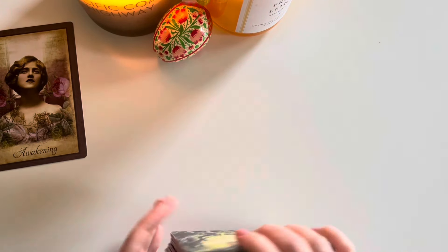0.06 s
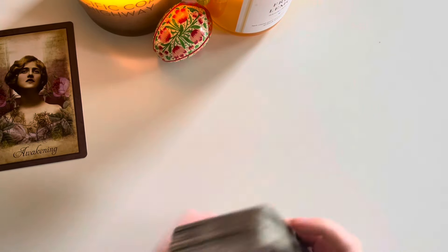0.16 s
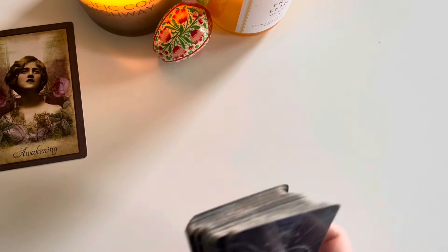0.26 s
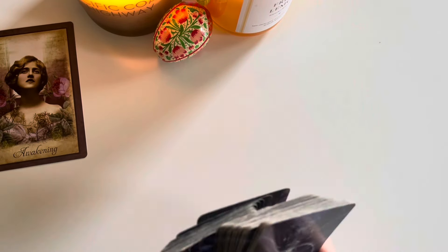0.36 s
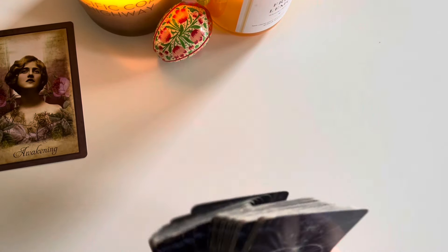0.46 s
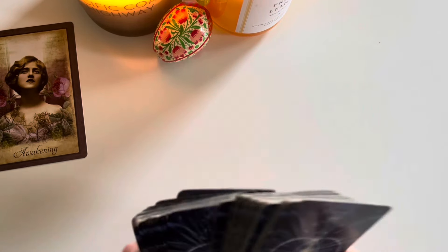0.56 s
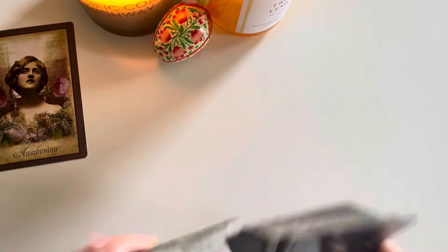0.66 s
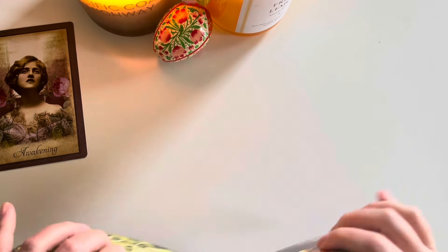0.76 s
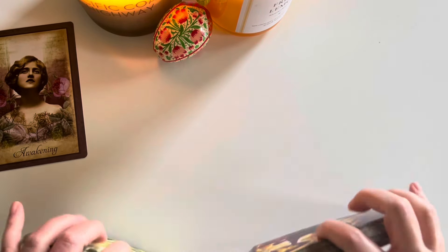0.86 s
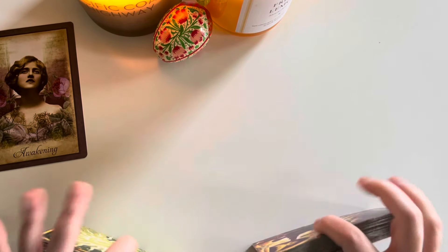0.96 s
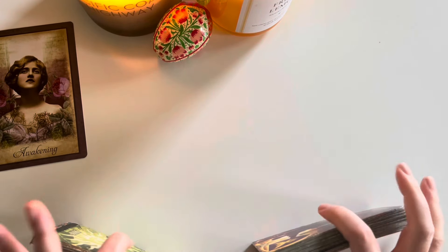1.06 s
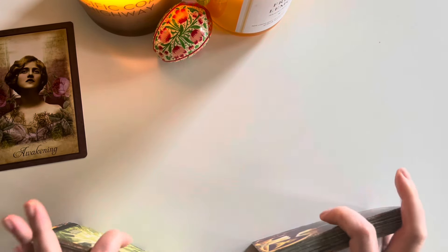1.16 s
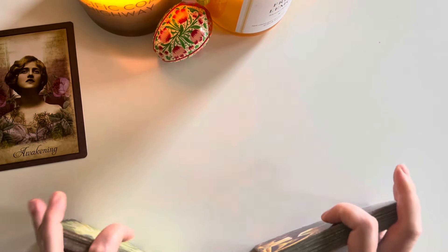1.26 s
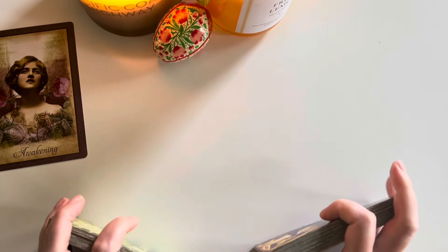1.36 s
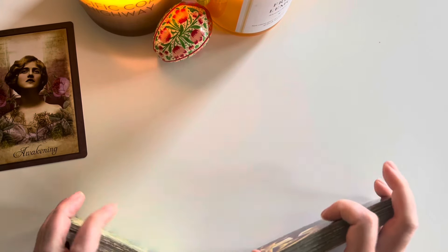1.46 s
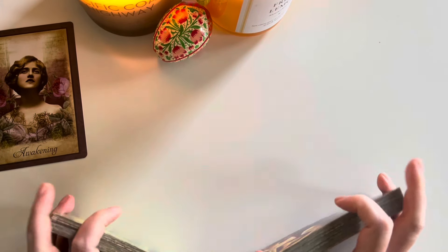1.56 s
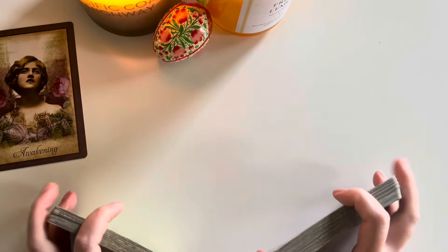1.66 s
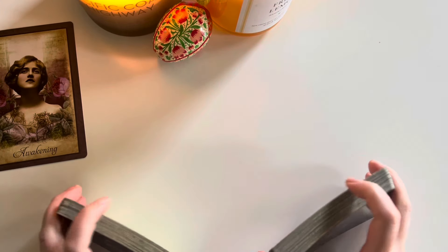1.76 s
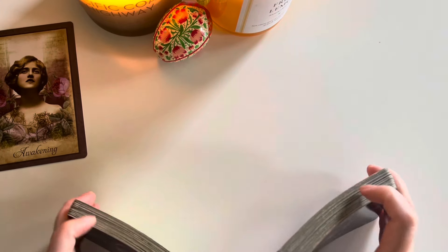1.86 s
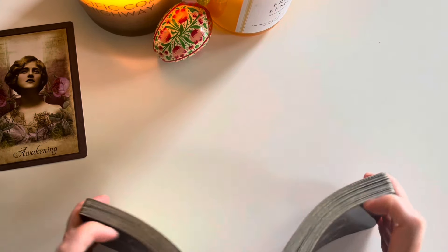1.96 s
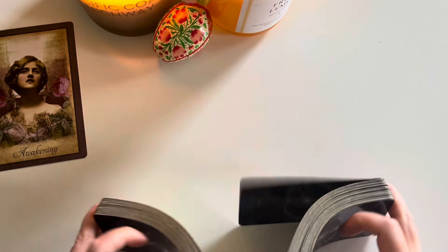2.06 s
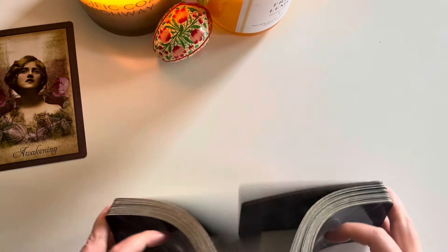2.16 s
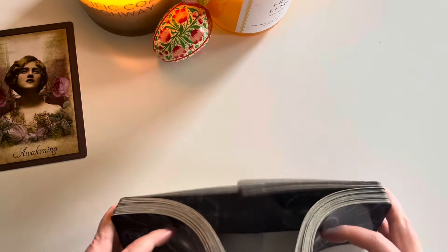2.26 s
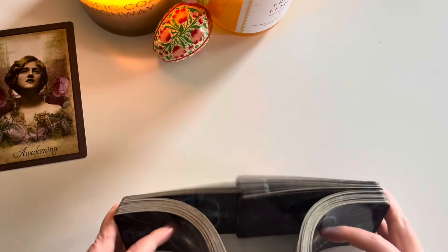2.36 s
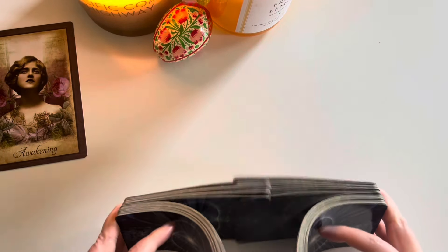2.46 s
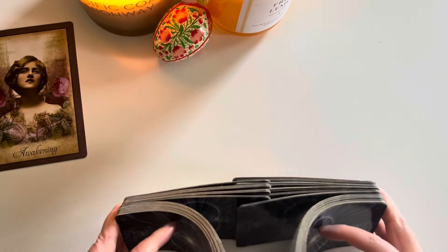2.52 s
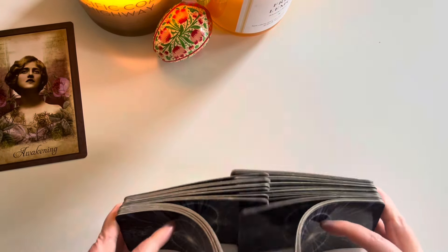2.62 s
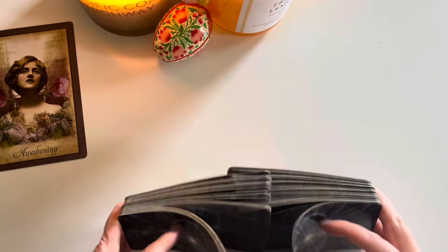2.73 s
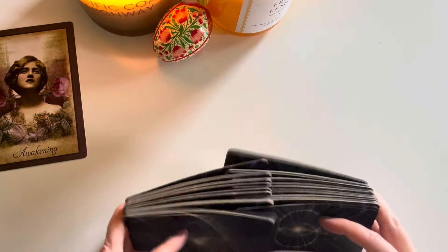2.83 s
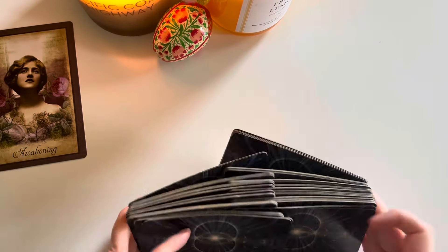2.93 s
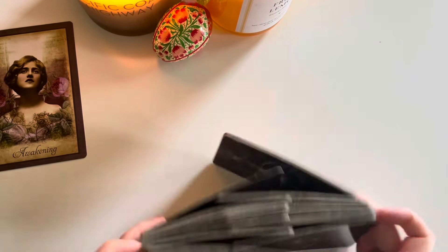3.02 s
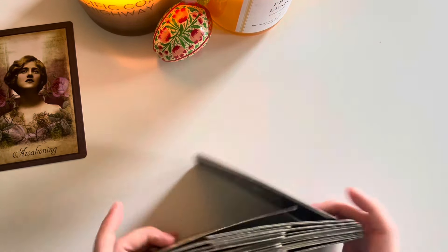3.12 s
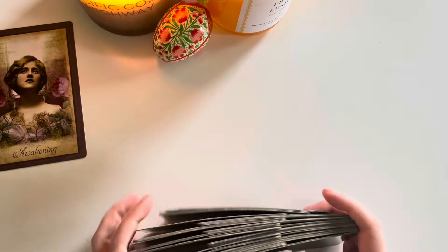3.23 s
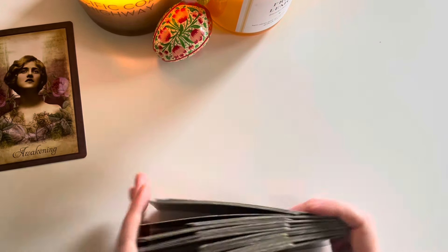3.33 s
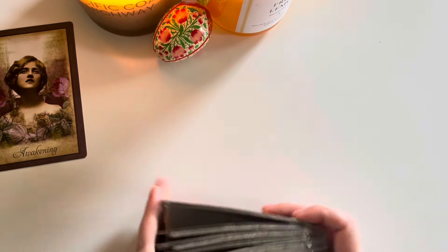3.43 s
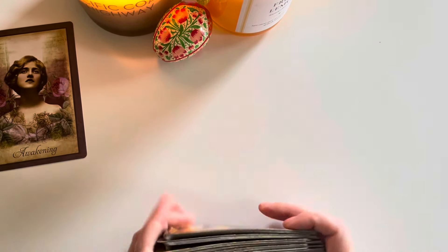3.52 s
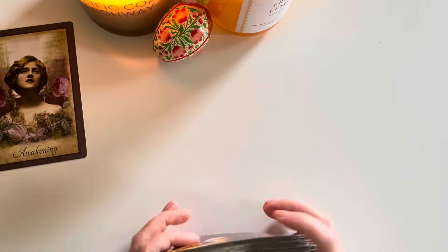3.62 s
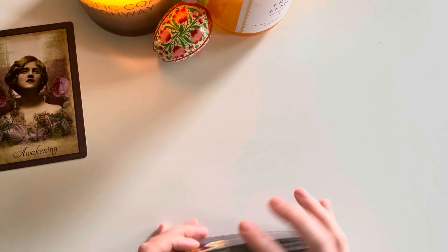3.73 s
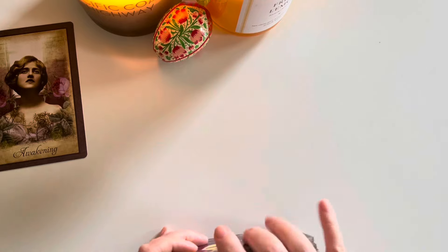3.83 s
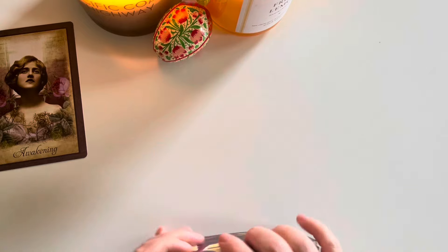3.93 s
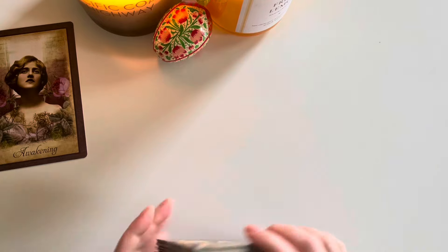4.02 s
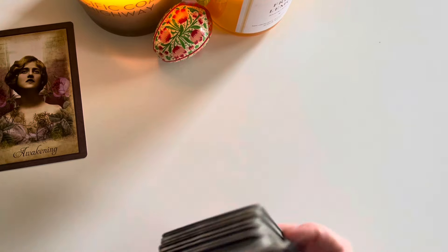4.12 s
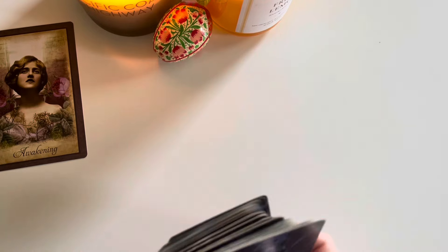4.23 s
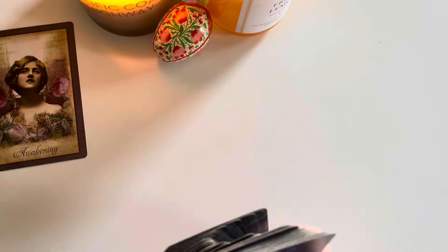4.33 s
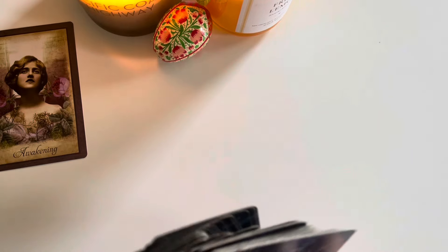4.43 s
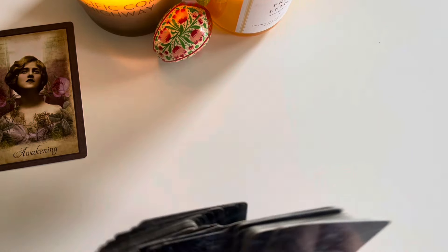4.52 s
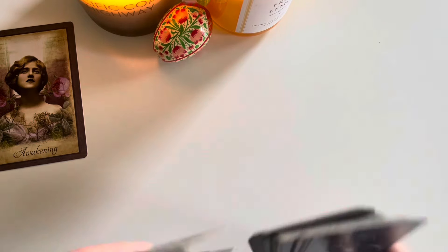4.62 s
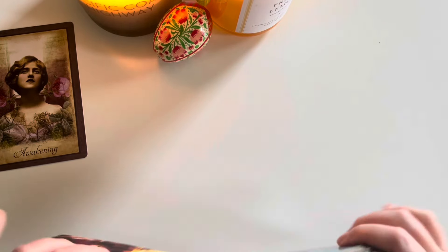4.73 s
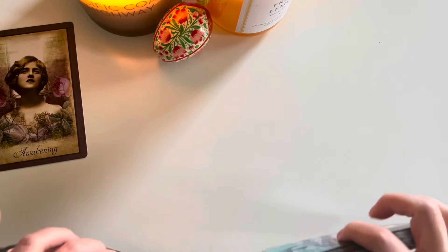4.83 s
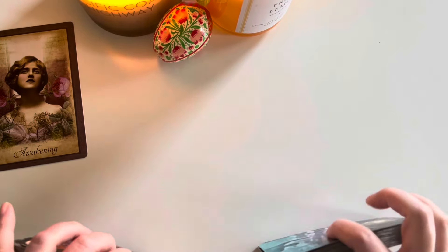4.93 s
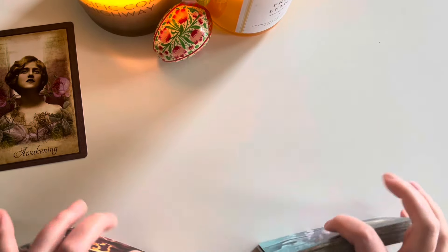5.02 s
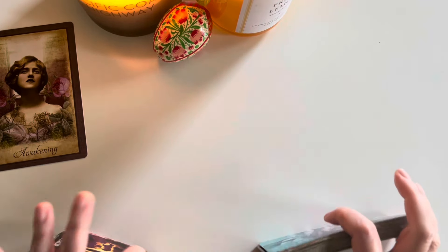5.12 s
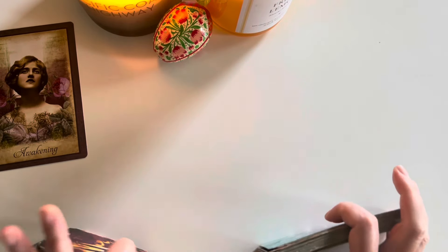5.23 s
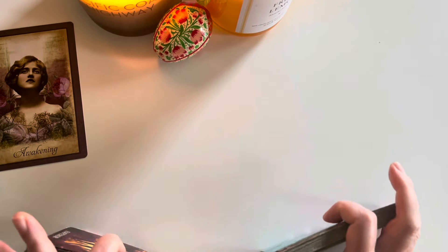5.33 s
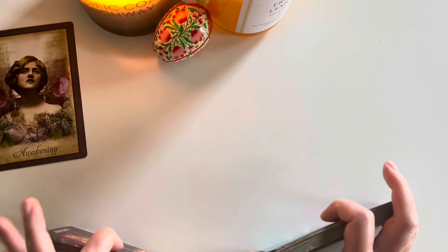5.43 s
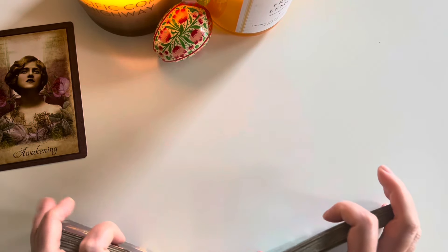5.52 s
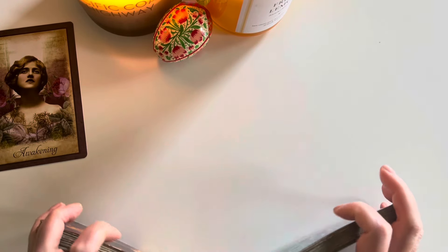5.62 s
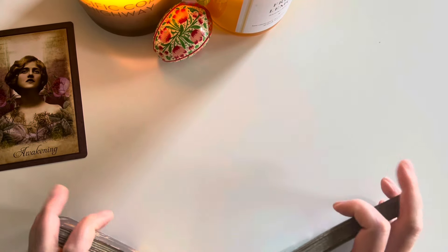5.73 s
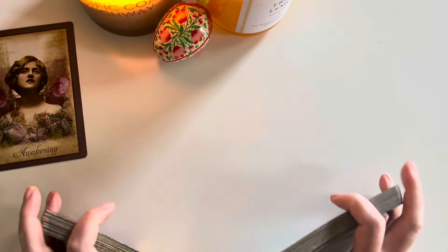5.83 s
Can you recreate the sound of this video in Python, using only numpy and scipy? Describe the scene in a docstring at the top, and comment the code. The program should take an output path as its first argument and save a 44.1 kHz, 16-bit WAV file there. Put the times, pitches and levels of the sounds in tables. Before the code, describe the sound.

Close stereo pickup of hands shuffling stiff cards at a table in a quiet, bare room. Faint slides lead to a tight clatter of packets, a pause, then a dense crackling riffle lasting under a second. Rustling, edge ticks and a small squeak follow as the deck is squared; another cut slaps down, and a packet finally knocks the table.

```python
"""In a bare, quiet room, a deck of stiff cards is cut and knocked, riffled close by, squared up and cut again.
Each big riffled card is a crack of noise, a short flap of bending tones, a soft pat and a puff of air.
Shaped noise makes the slides and rustles; short rings and clicks make the ticks; noise bursts make the knocks.
At the end a packet is set down hard on a table, heard as a set of quickly dying tones.
Most sounds leave a room tail, and a soft hush and faint hum run underneath."""
import sys
import numpy as np
from scipy import signal
from scipy.fft import rfft, irfft, next_fast_len
from scipy.io import wavfile
from scipy.ndimage import uniform_filter1d

SR = 44100
rng = np.random.default_rng(int(sys.argv[2]) if len(sys.argv) > 2 else 0)


def wrap_up_sound(samples):
    """Save the sound to the file named by the first command line argument, as 16-bit audio."""
    columns = np.atleast_2d(samples).T
    # keep every value between -1 and 1, then stretch to whole-number steps
    tamed = np.clip(columns, -1, 1)
    steps = np.round(tamed * 32767).astype(np.int16)
    wavfile.write(sys.argv[1], SR, steps)


N = 259308  # length of the scene in samples
T = np.arange(4096) / SR  # time inside one short sound, in seconds


def amp(db):
    """Turn decibels into a gain."""
    return 10 ** (np.asarray(db) / 20)


def unit(x):
    """Scale x to an average (rms) level of 1."""
    return x / np.sqrt(np.mean(x ** 2) + 1e-20)


def along(points, hz):
    """Read a curve of (Hz, value) points, joined by straight lines on a log frequency axis."""
    f, v = np.transpose(points)
    return np.interp(np.log(hz + 1), np.log(f + 1), v)


def filtered(x, response):
    """Filter x by multiplying its spectrum by a response, a function of frequency."""
    n = x.shape[-1]
    size = next_fast_len(n + 4096)
    spectrum = rfft(x, size) * response(np.fft.rfftfreq(size, 1 / SR))
    return irfft(spectrum, size)[..., :n]


def noise(spectrum, side, size):
    """Stereo noise of rms 1: one curve gives its colour, the other how strongly left and right differ."""
    def shape(hz):
        return amp(along(spectrum, hz)) * np.array([np.ones_like(hz), amp(along(side, hz))])

    mid, difference = filtered(rng.standard_normal((2, size)), shape)
    return unit(np.array([mid + difference, mid - difference]))


def resonance(hz, width, skirt_db):
    """A colour with one peak, falling to skirt_db at width octaves on either side and further beyond."""
    low, high = hz / 2 ** width, hz * 2 ** width
    return [(hz / 8, -60), (low, skirt_db), (hz, 0), (high, skirt_db), (hz * 16, -60)]


def burst(rise, t60):
    """An envelope of peak 1 that swells over about rise seconds and dies by 60 dB per t60 seconds."""
    shape = (1 - np.exp(-(T / rise) ** 2)) * amp(-60 * T / t60)
    return shape / shape.max()


def hit(rise, t60, spectrum, side):
    """A burst of coloured noise whose energy is set by its envelope."""
    envelope = burst(rise, t60)
    return unit(envelope * noise(spectrum, side, len(T))) * np.sqrt(np.mean(envelope ** 2))


def strokes(rows, sharpness=1.7):
    """Gain of hand strokes: each swells to its middle and is 10 dB down at both ends of its length."""
    t = np.arange(N) / SR
    power = 0
    for middle, db, length in rows:
        distance = np.abs(2 * (t - middle) / length)  # 0 in the middle, 1 at either end
        power = power + amp(db - 10 * distance ** sharpness) ** 2
    return np.sqrt(power)


def surge(s, rise, fall_db_per_s):
    """Gain of something let go at s seconds: it builds up, then falls steadily."""
    age = np.maximum(np.arange(N) / SR - s, 0)
    return (1 - np.exp(-age / rise)) * amp(-fall_db_per_s * age)


def grain(rate, depth_db):
    """Uneven catching of paper on paper: a gain of rms 1 that wanders between rate random points a second."""
    knots = rng.standard_normal(N // 8)
    wander = np.interp(np.arange(N) * rate / SR, np.arange(len(knots)), knots)
    return unit(amp(depth_db * wander))


def add(track, s, sound):
    """Mix a sound into the track at s seconds."""
    part = track[:, max(round(s * SR), 0):][:, :sound.shape[-1]]
    part += sound[..., :part.shape[-1]]


# colour of the quiet hush of the room [pitch_hz, level_db]
AIR_COLOUR = [(25, -21.5), (50, -1), (134, -11), (620, -25), (7310, -38), (16000, -49)]
# how much left and right differ in sound spread through the room [pitch_hz, side_minus_mid_db]
DIFFUSE_WIDTH = [(60, -15.5), (250, -10), (700, -2), (2000, -2), (6000, -21.5), (11000, -16.5)]


def hush(air_db=-60):
    """The low hush of the room: steady, quiet coloured noise."""
    return amp(air_db) * noise(AIR_COLOUR, DIFFUSE_WIDTH, N)


# faint steady tones in the room [pitch_hz, level_db]
HUM_TONES = [(72, -76), (878, -79), (1174, -79.5)]


def hum():
    """Weak steady sine tones in the hush of the room."""
    t = np.arange(N) / SR
    return sum(amp(db) * np.sqrt(2) * np.sin(2 * np.pi * hz * t) for hz, db in HUM_TONES)


# colour of the sound returned by the walls [pitch_hz, level_db]
WALL_COLOUR = [(30, -8.5), (70, 0.5), (125, -2), (200, 1.5), (350, -3.5), (2500, -2.5), (6000, -0.5),
               (9500, -5.5), (12000, -15), (16000, -22)]
# time the room takes to die by 60 dB [pitch_hz, t60_s]
ROOM_DECAY = [(80, 1), (210, 0.66), (560, 0.64), (1500, 0.73), (4500, 0.58), (10000, 0.5), (16000, 0.22)]
# single tones that stand out of the room's answer [pitch_hz, relative_level_db]
ROOM_TONES = [(293, -13), (424, -25), (488, -20), (1020, -20.5), (1176, -25)]
ROOM_TONE_T60_S = 0.64


def room(x, build=0.00093):
    """The room's answer: it builds up, then each frequency dies at its own speed; a few tones stand out."""
    hz, t, z = signal.stft(noise(WALL_COLOUR, DIFFUSE_WIDTH, SR), SR, nperseg=256)
    dying_by_pitch = amp(-60 * t / along(ROOM_DECAY, hz)[:, None])
    fade = dying_by_pitch * (1 - np.exp(-(t / build) ** 2))
    tail = signal.istft(z * fade, SR, nperseg=256)[1]
    age = np.arange(tail.shape[1]) / SR
    dying = amp(-60 * age / ROOM_TONE_T60_S)
    tones = sum(amp(db) * np.sin(2 * np.pi * f * age) for f, db in ROOM_TONES)
    answer = tail / np.linalg.norm(tail[0]) + tones * dying / np.linalg.norm(dying)
    return signal.fftconvolve(x[:1], answer, axes=1)[:, :N]


# how much left and right differ in sounds close by [pitch_hz, side_minus_mid_db]
NEAR_WIDTH = [(100, -12.5), (900, -11.5), (2500, -1.5), (8000, -7), (15000, -28)]
# fingertips bumping the deck [start_s, relative_level_db, pitch_hz]
FINGER_BUMPS = [(0.038, -42.5, 106.4), (0.107, -48.5, 200), (1.558, -50, 293.7), (1.747, -47, 720),
                (1.759, -43, 400)]


def bumps(room_db=-6):
    """A fingertip meets the deck with a soft thump: a short burst of noise around one pitch."""
    out = np.zeros((2, N))
    for s, db, hz in FINGER_BUMPS:
        colour = resonance(hz, width=0.25, skirt_db=-10.5)
        add(out, s, amp(db) * hit(rise=0.0025, t60=0.016, spectrum=colour, side=NEAR_WIDTH))
    return out + amp(room_db) * room(out)


# card faces sliding over each other [middle_s, relative_level_db, length_s]
CARD_SLIDES = [(0.03, -71, 0.13), (0.225, -63, 0.021), (0.33, -51, 0.067), (0.429, -57, 0.01),
               (0.555, -55.5, 0.12), (0.703, -48, 0.0057), (0.74, -52, 0.077), (1.775, -62, 0.032),
               (2.96, -41, 0.36), (3.22, -49, 0.068), (3.43, -43.5, 0.25), (4.16, -63, 0.034),
               (4.28, -50.5, 0.077), (4.505, -56.5, 0.15), (4.74, -61, 0.064)]
# fingers shifting the packets [middle_s, relative_level_db, length_s]
FINGER_WORK = [(0.05, -54, 0.23), (1.22, -48.5, 0.33), (3.09, -34.5, 0.16), (3.215, -28.5, 0.19),
               (3.55, -37, 0.39), (4.97, -35, 0.11), (5.105, -31, 0.16)]
# the bowed deck squeaking as it relaxes [middle_s, relative_level_db, length_s]
DECK_SQUEAKS = [(3.089, -30.5, 0.0393), (3.138, -37, 0.067)]
# colour of sliding card faces [pitch_hz, level_db]
SWISH_COLOUR = [(200, -19), (900, -1), (2000, 3.5), (8500, 0), (11000, -10), (16000, -15)]
# colour of fingers and edges rustling [pitch_hz, level_db]
RUSTLE_COLOUR = [(40, 1.5), (130, -0.5), (200, -6), (330, 2.5), (700, -4), (1700, -4.5), (3000, -11.5),
                 (6000, -36.5), (14000, -54.5)]


def friction(slide_db=2, handling_db=-3.0, squeak_hz=1020, room_db=-15):
    """Smooth card faces swish; fingers and edges rustle in coarser grains; the bowed stack squeaks."""
    fine_catching = grain(rate=740, depth_db=2.5)
    swish = strokes(CARD_SLIDES) * fine_catching * noise(SWISH_COLOUR, DIFFUSE_WIDTH, N)
    coarse_catching = grain(rate=170, depth_db=3.5)
    rustle = strokes(FINGER_WORK) * coarse_catching * noise(RUSTLE_COLOUR, DIFFUSE_WIDTH, N)
    stack = resonance(squeak_hz, width=.25, skirt_db=-24)
    squeak = strokes(DECK_SQUEAKS) * noise(stack, NEAR_WIDTH, N)
    out = amp(slide_db) * swish + amp(handling_db) * rustle + squeak
    return out + amp(room_db) * room(out)


def flutter(count=400, level_db=1, spread_db=10, click_db=-2):
    """Rows of small random ticks wherever the fingers work on the deck, stronger where they work harder."""
    work_db = 20 * np.log10(strokes(FINGER_WORK) + 1e-9)
    rows = []
    for k, (place, size) in enumerate(rng.uniform(0, 1, (count, 2))):
        at = int(N * (k + place) / count)
        ring_db = work_db[at] + level_db - spread_db * size
        if work_db[at] > -60:  # skip places where the hands are still
            rows.append((at / SR, ring_db, ring_db + click_db))
    return rows


# card edges ticking against each other [start_s, relative_ring_db, relative_click_db]
EDGE_TICKS = [(1.071, -35, -30), (1.201, -39, -54), (1.432, -43.5, -75), (3.178, -35.5, -40),
              (3.1914, -23.5, -27), (3.206, -28, -26), (3.228, -26, -31), (3.448, -40, -31),
              (3.503, -27.5, -21.5), (3.529, -23, -29), (3.541, -29, -30), (3.611, -27, -38),
              (4.518, -52, -40), (4.8807, -31.5, -33), (5.0737, -23, -17.5), (5.104, -27, -37),
              (5.126, -26, -30), (5.282, -34.5, -52), (5.545, -32, -52)]
# colour of clicking card edges [pitch_hz, level_db]
EDGE_COLOUR = [(800, -7), (2500, 7), (4500, 0.5), (9000, -13), (11000, -29.5), (16000, -44)]
# the note of the held stack, and how far the grip shifts it
STACK_HZ, GRIP_OCTAVES = 1121, 0.051


def ticks(ring_room_db=-16, click_room_db=-9):
    """Edges catch and let go: the held stack rings briefly, close by, and the click carries into the room."""
    rings, clicks = np.zeros((2, N)), np.zeros((2, N))
    for s, ring_db, click_db in EDGE_TICKS + flutter():
        hz = STACK_HZ * 2 ** (GRIP_OCTAVES * rng.uniform(-0.79, 1))
        tone = np.sin(2 * np.pi * hz * T)
        blur = noise(resonance(hz, width=0.7, skirt_db=-12), NEAR_WIDTH, len(T))
        stack = .8 * tone + .7 * blur
        add(rings, s, amp(ring_db) * burst(rise=0.0018, t60=0.019) * stack)
        click = hit(rise=0.00071, t60=0.014, spectrum=EDGE_COLOUR, side=NEAR_WIDTH)
        add(clicks, s, amp(click_db) * click)
    return rings + clicks + room(amp(ring_room_db) * rings + amp(click_room_db) * clicks)


# a packet set down hard on the table [start_s, relative_level_db]
TABLE_HIT = (5.7068, -19)
# the tones the table rings with [pitch_hz, relative_level_db, t60_s]
TABLE_TONES = [(76, -19, 0.075), (151, -9, 0.037), (238, -13.5, 0.039), (376, -10, 0.02), (638, -1, 0.024),
               (1007, -10, 0.022), (1556, -8, 0.044), (2060, -4, 0.0045), (2840, -9, 0.013),
               (3970, -13, 0.0065)]
# colour of cards clacking together [pitch_hz, level_db]
CLACK_COLOUR = [(200, -26), (500, -10.5), (1100, 3.5), (1600, -2), (2400, -7.5), (3500, -17), (6000, -20),
                (12000, -35)]


def set_down(click_db=-12, room_db=-4.0):
    """The end of a packet hits the table: a thud of quickly dying tones, the low ones swelling more slowly."""
    out = np.zeros((2, N))
    s, peak_db = TABLE_HIT
    for k, (hz, db, t60) in enumerate(TABLE_TONES):
        tone = (-1) ** k * np.sin(2 * np.pi * hz * T)  # every other tone starts downwards
        add(out, s, amp(peak_db + db) * burst(.5 / hz, t60) * tone)
    click = hit(rise=0.00018, t60=0.044, spectrum=CLACK_COLOUR, side=NEAR_WIDTH)
    add(out, s, amp(peak_db + click_db) * click)
    return out + amp(room_db) * room(out)


# cards and packets slapping each other [start_s, relative_strength_db, brightness_db]
CARD_KNOCKS = [(0.861, -20.5, -12), (0.8776, -9, 10), (0.886, -5, 5), (0.89, -1.5, -9), (0.9003, -11, 2),
               (0.9105, -10, 3), (1.2473, -30.5, -19), (1.556, -33.5, -19), (4.875, -26, -5),
               (4.8811, -11.5, -1.5), (4.906, -8, -10.5), (4.9259, -10.5, 2), (4.9328, -9.5, -0.5),
               (4.949, -9, -1), (4.9634, -12, -10.5), (5.39, -19.5, 4), (5.524, -24.5, -19.5)]
# colour of the soft thud of a pile [pitch_hz, level_db]
THUD_COLOUR = [(40, -16.5), (105, 0), (170, -13), (270, 1), (470, 5.5), (620, 2), (900, -12), (2000, -21),
               (6000, -66)]
# a soft landing is mostly thud: thud at strength 0 dB, dB gained per dB of strength, lost per dB of brightness
THUD_DB, THUD_GROWS, THUD_LOSES = -21, 0.68, 0.078


def knocks(clack_gain_db=-11, edge_gain_db=-17, rattle_db=-6, settle_s=0.18, settle_db=21, room_db=-4.0, count=4):
    """Cards land on cards: edges click, the stack clacks and thuds, and loose ones tap after it, ever weaker."""
    out = np.zeros((2, N))
    for s, db, bright_db in CARD_KNOCKS:
        edge = hit(rise=0.0025, t60=0.05, spectrum=EDGE_COLOUR, side=DIFFUSE_WIDTH)
        clack = hit(rise=0.00073, t60=0.021, spectrum=CLACK_COLOUR, side=NEAR_WIDTH)
        thud = hit(rise=0.0018, t60=0.075, spectrum=THUD_COLOUR, side=NEAR_WIDTH)
        thud_db = THUD_DB + THUD_GROWS * db - THUD_LOSES * bright_db
        slap = amp(db + bright_db + edge_gain_db) * edge + amp(db + clack_gain_db) * clack + amp(thud_db) * thud
        add(out, s, slap)
        add(out, s, amp(room_db) * room(slap))  # the hands move, so each slap meets the room afresh
        for late in (np.arange(count) + rng.uniform(0, 1, count)) / count:
            tap = hit(rise=0.0003, t60=0.012, spectrum=CLACK_COLOUR, side=NEAR_WIDTH)
            tap_db = db + clack_gain_db + rattle_db - settle_db * late
            add(out, s + settle_s * late, amp(tap_db) * tap)
    return out


# a run of cards zipping down at once [start_s, end_s, relative_level_db]
ZIP_RUN = (2.585, 2.725, -16)


def zipping():
    """1 while the run of cards zips down and 0 outside it, with smoothed edges."""
    t = np.arange(N) / SR
    return uniform_filter1d(1.0 * ((t > ZIP_RUN[0]) & (t < ZIP_RUN[1])), size=900)


def zip_run(zip_hz=2750, rise=0.0022, fall_db_per_s=52):
    """A run of cards slips at once with a slowly weakening rasp of grainy noise."""
    start, _, db = ZIP_RUN
    colour = resonance(zip_hz, width=0.6, skirt_db=-11.5)
    rasp = grain(rate=380, depth_db=5) * noise(colour, DIFFUSE_WIDTH, N)
    return amp(db) * zipping() * surge(start, rise, fall_db_per_s) * rasp


# the stream of lesser cards builds up after the first snap and thins as the two halves run out
FLOW_DB, FLOW_RISE_S, FLOW_FALL_DB_PER_S = -22, 0.99, 13.5


def flow(lull_db=-8):
    """Gain of the stream of cards leaving the thumbs, from first snap to last; it lulls during the zip."""
    running = np.arange(N) / SR < CARD_SNAPS[-1][0]
    stream = running * surge(CARD_SNAPS[0][0], FLOW_RISE_S, FLOW_FALL_DB_PER_S)
    return amp(FLOW_DB + lull_db * zipping()) * uniform_filter1d(stream, size=900)


def flap(hz, swell=0.0022, overtones=((1.8, -5), (2.7, -8)), vary_db=3):
    """A card's bending tones (pitch multiple, dB) swell just after the crack and die within a few cycles."""
    envelope = (T / swell * np.exp(1 - T / swell)) ** 3

    def mode(f):
        return unit(envelope * noise(resonance(f, width=0.2, skirt_db=-17), NEAR_WIDTH, len(T)))

    # each card is bent differently, so its upper tones vary in level
    upper = sum(amp(db + rng.normal(0, vary_db)) * mode(k * hz) for k, db in overtones)
    return (mode(hz) + upper) * np.sqrt(np.mean(envelope ** 2))


# colour of a card cracking off the thumb [pitch_hz, level_db]
CRACK_COLOUR = [(300, -5.5), (900, 1), (2000, -3), (4000, -4.5), (8500, -3), (12000, -9), (16000, -16)]


def loose_cards(stream, count=84, level_db=6, spread_db=5, flap_hz=950, crack_db=1):
    """Single cards slip out between the big snaps, each with its own small crack and flap."""
    out = np.zeros((2, N))
    first, last = CARD_SNAPS[0][0], CARD_SNAPS[-1][0]
    for k, (place, size, pitch) in enumerate(rng.uniform(-1.3, 1, (count, 3))):
        s = np.interp(k + place, [-1, count], [first, last])
        crack = hit(rise=0.00062, t60=0.014, spectrum=CRACK_COLOUR, side=NEAR_WIDTH)
        card = flap(flap_hz * 2 ** (pitch / 2)) + amp(crack_db) * crack
        add(out, s, stream[round(s * SR)] * amp(level_db + spread_db * size) * card)
    return out


def puffs(level_db=-25, grows_db_per_s=6, hollow_hz=124, rise=0.025, fall_db_per_s=85):
    """Each flap squeezes air from the hollow between the hands, more as the hollow closes."""
    push = 0
    for s, _, flap_db, _ in CARD_SNAPS:
        push_db = flap_db + grows_db_per_s * (s - CARD_SNAPS[0][0])
        push = push + (amp(push_db) * surge(s, rise, fall_db_per_s)) ** 2
    hollow = resonance(hollow_hz, width=0.38, skirt_db=-14.0)
    return amp(level_db) * np.sqrt(push) * noise(hollow, NEAR_WIDTH, N)


# the loudest cards snapping off the thumbs [start_s, relative_crack_db, relative_flap_db, flap_pitch_hz]
CARD_SNAPS = [(2.0723, -3.5, -12, 857), (2.138, -5, -23.5, 1010), (2.1918, -11, -13.5, 877),
              (2.2218, -2.5, -16, 2300), (2.2376, 3.5, -17.5, 890), (2.2445, -11.5, -12.5, 820),
              (2.2716, -8, -13.5, 820), (2.2785, -7.5, -21.5, 1620), (2.2828, -13.5, -19.5, 890),
              (2.2868, -14, -17.5, 1495), (2.2999, -6, -17.5, 830), (2.3235, -16, -21.5, 855),
              (2.3574, -13, -22.5, 1000), (2.3645, -3, -10.5, 892), (2.3685, -9.5, -12, 851.5),
              (2.386, -15.5, -23.5, 909), (2.436, -2, -23.5, 739.5), (2.4572, -6, -7.5, 830),
              (2.4706, -1, -10.5, 877), (2.4745, -10, -12, 1570), (2.4825, -0.5, -11, 1400),
              (2.488, -18, -17.5, 850), (2.566, -9.5, -6.5, 1490), (2.5846, -2.5, -5.5, 1750),
              (2.59, 3.5, -12, 2810), (2.6023, -13, -14.5, 2400), (2.6316, -6, -22.5, 2520),
              (2.7206, 0, -12.5, 1070), (2.7435, 2, -21, 990), (2.7485, 0, -8, 1093),
              (2.7586, -13.5, -14, 1680), (2.7825, -6.5, -15.5, 1950), (2.826, 6.5, -7.5, 1990),
              (2.8544, -13, -16, 1062)]
# colour that the cupped hands and arched cards give the riffle [pitch_hz, level_db]
CUPPED_COLOUR = [(430, 0), (600, -4), (860, 1.5), (1230, -2.5), (1550, -0.5)]


def riffle(crack_gain_db=-7, flap_gain_db=2, pat_db=-16, scrape_db=-8, room_db=-11):
    """Big cards crack off the thumb, flap and pat the pile; the rest scrape by; the flaps push air out."""
    stream = flow()
    catching = grain(rate=350, depth_db=5)
    scrape = stream * catching * noise(CLACK_COLOUR, NEAR_WIDTH, N)
    out = loose_cards(stream) + zip_run() + amp(scrape_db) * scrape
    out += amp(room_db) * room(out)
    for s, crack_db, flap_db, hz in CARD_SNAPS:
        crack = hit(rise=0.00054, t60=0.013, spectrum=CRACK_COLOUR, side=NEAR_WIDTH)
        pat = hit(rise=0.013, t60=0.11, spectrum=THUD_COLOUR, side=NEAR_WIDTH)
        landing = amp(flap_gain_db) * flap(hz) + amp(pat_db) * pat
        snap = amp(crack_db + crack_gain_db) * crack + amp(flap_db) * landing
        add(out, s, snap)
        add(out, s, amp(room_db) * room(snap))  # each card sounds from a slightly different place
    return filtered(out, lambda hz: amp(along(CUPPED_COLOUR, hz))) + puffs()


def scene():
    """The cards over the low hush of the room."""
    background = hush() + hum()
    hands = bumps() + friction() + ticks()
    return background + hands + set_down() + knocks() + riffle()


# phase by which the left microphone port leads the right [pitch_hz, lead_radians]
PORT_LEAD = [(1900, 0), (2900, 1.08), (7500, 1.59), (8800, 0), (10300, -3.5), (11400, 0.5), (13800, -4.5),
             (15200, 1)]
TOP_HZ = 16300  # the sound stops steeply above this pitch


def record(dry, presence_db=2.5):
    """The two ports differ in treble level and phase; peaks beyond full scale are clipped flat."""
    def left(hz):
        lean = amp(presence_db * np.interp(hz, [2400, 4400, 12000], [0, 1, 0]))
        return lean * np.exp(.5j * np.interp(hz, *np.transpose(PORT_LEAD)))

    # the right port gets the opposite level and phase change
    heard = filtered(dry, lambda hz: np.array([left(hz), 1 / left(hz)]))
    return filtered(np.clip(heard, -1, 1), lambda hz: 1 / (1 + (hz / TOP_HZ) ** 80))


dry = scene()
out = record(dry)
wrap_up_sound(out)
```